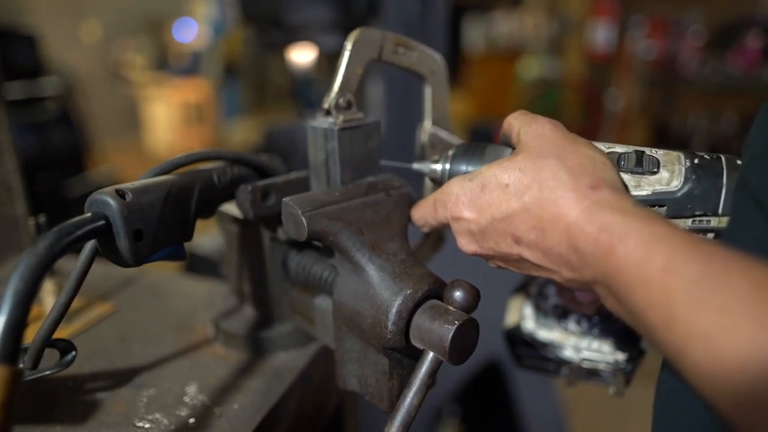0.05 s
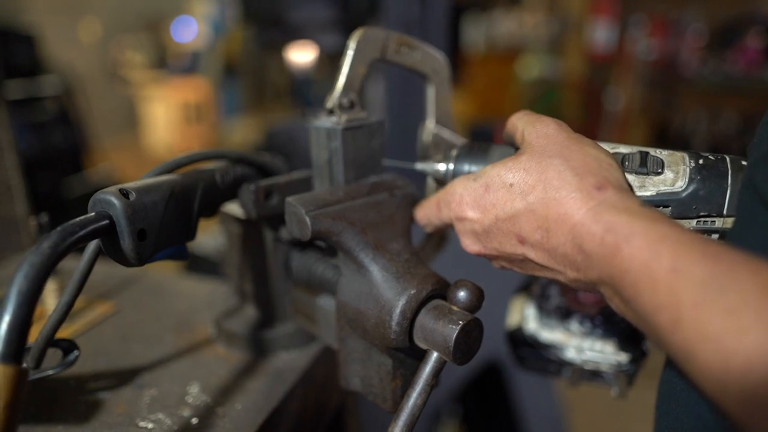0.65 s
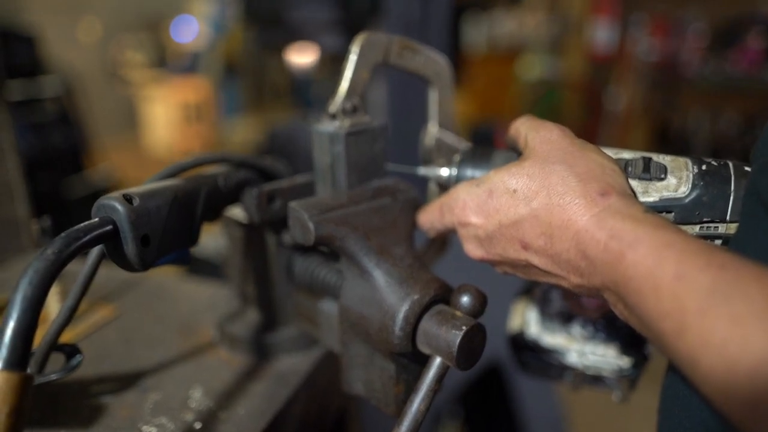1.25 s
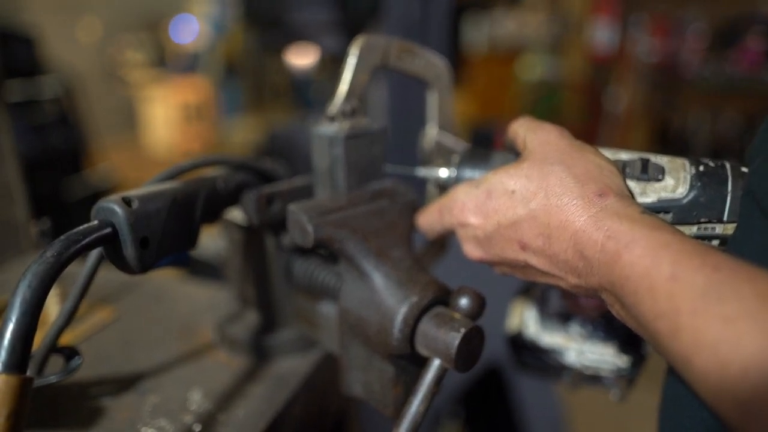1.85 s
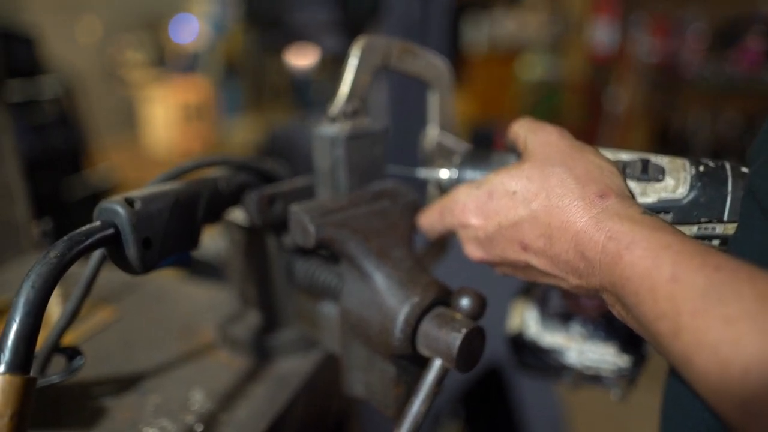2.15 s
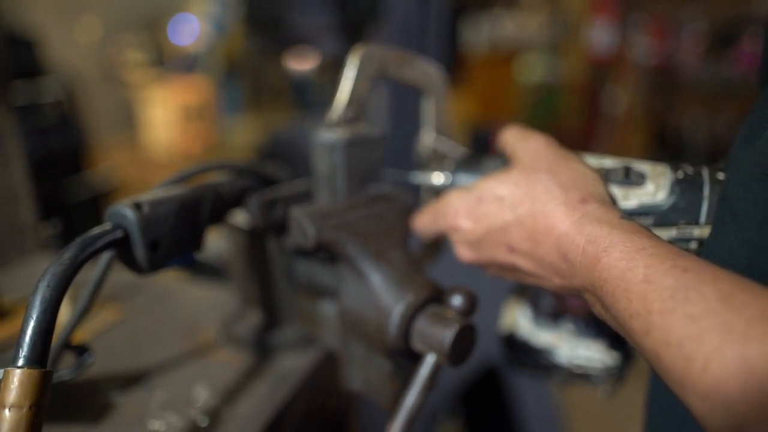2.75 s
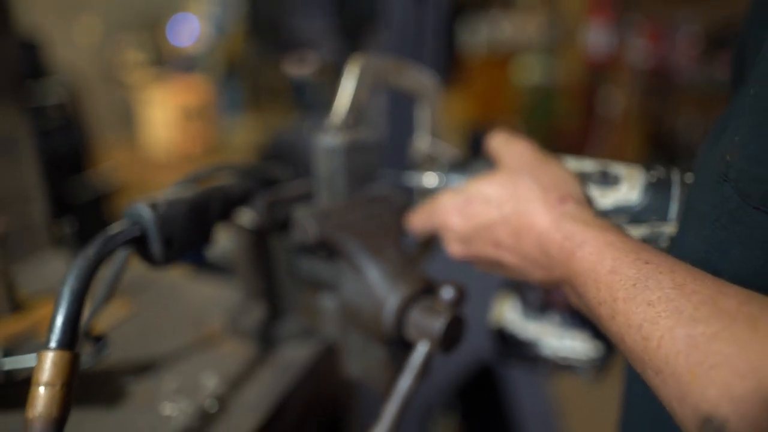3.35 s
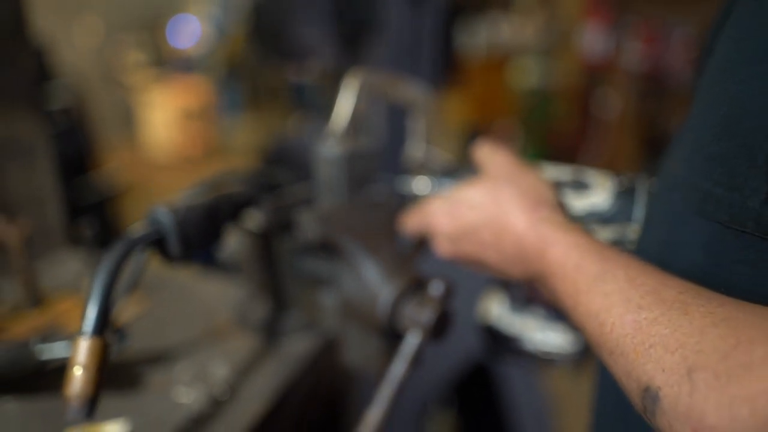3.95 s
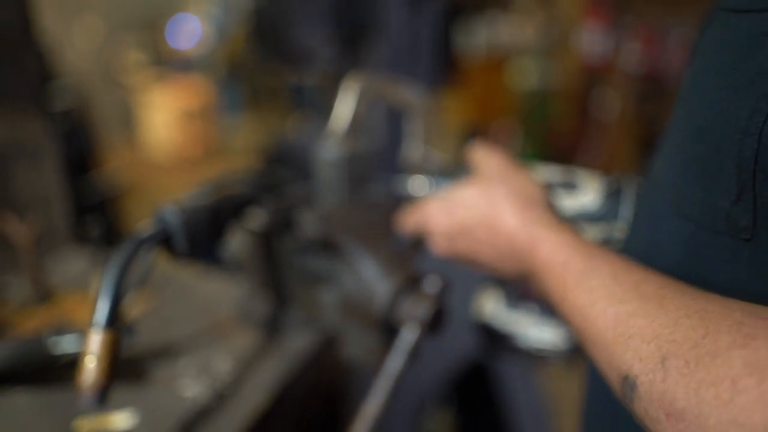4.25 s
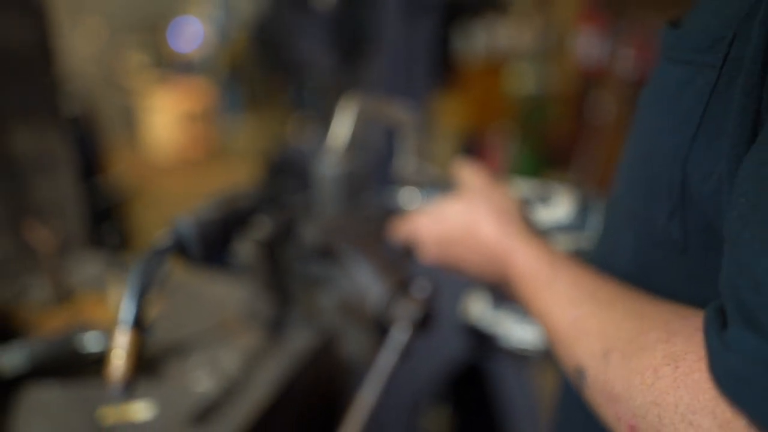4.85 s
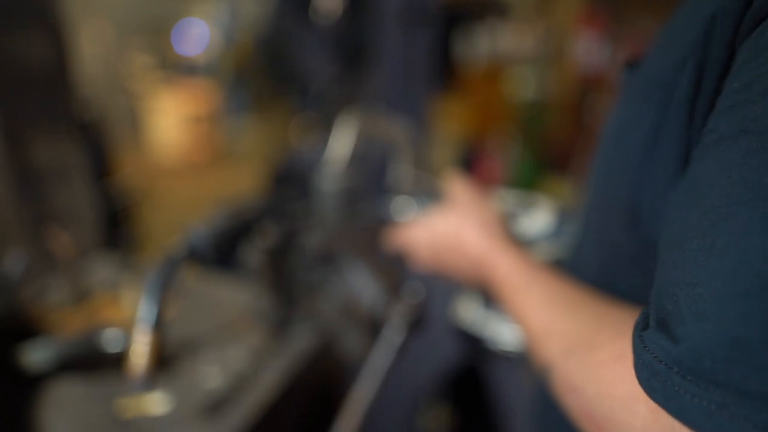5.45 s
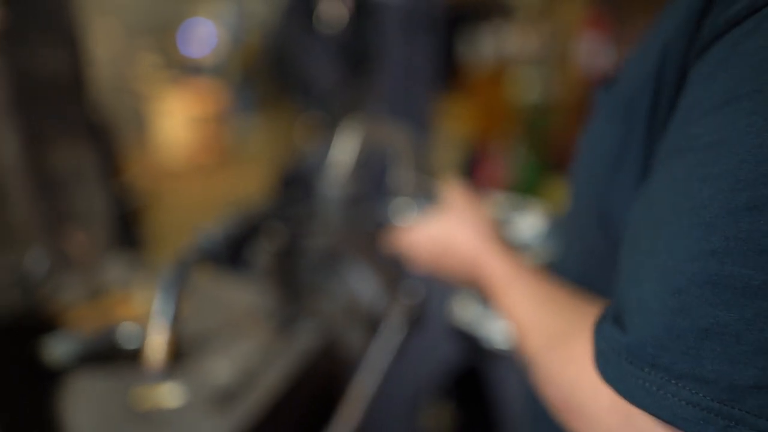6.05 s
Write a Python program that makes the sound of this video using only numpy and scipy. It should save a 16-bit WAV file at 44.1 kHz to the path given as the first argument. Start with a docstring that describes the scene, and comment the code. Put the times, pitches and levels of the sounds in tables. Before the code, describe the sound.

A cordless drill whines as it bores into metal, its pitch sagging in steps until it nearly stalls and labours on.

```python
"""A cordless drill bores into a metal can held in a vice in a workshop. At first it runs freely: the
motor whines, gear teeth rattle, the fan rushes and the bit scrapes. As the bit bites, the motor sags in
steps, and its whine and gear tones sweep down through the resonances of the casing. Around 3 s the gears
sing; from 3.55 s a hard lean shakes the bench. From 4.45 s the bit digs in and the can's ring climbs.
The motor nearly stalls twice, at 4.7 s and 5.3 s, then picks up a little and labours on."""
import sys
import numpy as np
from scipy import signal
from scipy.fft import rfft, irfft, next_fast_len
from scipy.io import wavfile
from scipy.ndimage import map_coordinates

SR = 44100
rng = np.random.default_rng(int(sys.argv[2]) if len(sys.argv) > 2 else 0)


def output_pcm(signal):
    """Save a mono or channel-first signal as 16-bit PCM at the path in sys.argv[1].

    Samples are clipped to [-1, 1] before scaling.
    """
    pcm = np.clip(np.atleast_2d(signal).T, -1, 1) * 32767
    wavfile.write(sys.argv[1], SR, np.round(pcm).astype(np.int16))


N = 269054


def amp(db):
    """Decibels to gain."""
    return 10 ** (np.asarray(db) / 20)


def unit(x):
    """Scale to rms 1."""
    return x / np.sqrt(np.mean(x ** 2) + 1e-20)


def ease(start_s, length_s):
    """A smooth step from 0 to 1."""
    progress = np.clip((np.arange(N) / SR - start_s) / length_s, 0, 1)
    return (1 - np.cos(np.pi * progress)) / 2


def wobble(rate):
    """A smooth random modulator with rate knots a second."""
    knots = rng.standard_normal(int(N * rate / SR) + 4)
    return map_coordinates(knots, [np.arange(N) * rate / SR])


def filtered(x, response):
    """Filter x by a complex response, given as a function of frequency."""
    size = next_fast_len(N + SR // 2)
    return irfft(rfft(x, size) * response(np.fft.rfftfreq(size, 1 / SR)), size)[:N]


def equalised(x, curve):
    """Shape x with an EQ curve of (frequency [Hz], gain [dB]) points."""
    points_hz, db = np.transpose(curve)
    return filtered(x, lambda hz: amp(np.interp(np.log(hz + 1), np.log(points_hz), db)))


def coloured(x, curve):
    """Shape x with an EQ curve and bring it to rms 1."""
    return unit(equalised(x, curve))


def rung(x, modes):
    """Ring a bank of resonances of alternating polarity with x."""
    return filtered(x, lambda hz: sum(
        (-1) ** k * amp(db) * 1j * hz * width / (centre ** 2 - hz ** 2 + 1j * hz * width)
        for k, (centre, width, db) in enumerate(modes)))


def tone(turns, order, waver_db, rough):
    """A partial of order cycles per shaft turn; uneven contact scatters some into a noisy skirt."""
    angle = 2 * np.pi * (order * turns + rng.random())
    skirt = wobble(330) * np.sin(angle) + wobble(330) * np.cos(angle)
    partial = (np.sqrt(2) * np.sin(angle) + rough * skirt) / np.sqrt(1 + rough ** 2)
    return amp(waver_db * wobble(9)) * partial


def workshop(x, wet_db=-5, t60_s=0.14):
    """Bench, shelves and walls add a short, dense tail; the mix comes out at rms 1."""
    t = np.arange(SR // 3) / SR
    tail = rng.standard_normal(len(t)) * amp(-60 * t / t60_s) * (t > .002)
    wet = signal.fftconvolve(x, tail / np.linalg.norm(tail))[:N]
    return unit(x + amp(wet_db) * wet)


# Low modes of the bench and vice: (frequency [Hz], width [Hz], relative level [dB])
BENCH_MODES = [(42, 25, -30), (108.1, 5, 18), (210, 61, -9.5)]
# Dull body of a knock through the can and vice: (frequency [Hz], relative level [dB])
KNOCK_EQ = [(22, -28), (45, -16), (75, -7), (150, 0), (250, 3.5), (370, 2.5), (450, 0), (620, 5.5),
            (760, -15), (1400, -25), (2500, -39)]
def bench(load, jam, lean, hole, catches_per_s=160):
    """The catching bit knocks on the can, hardest when it jams; the push sets the bench droning."""
    drone_db = -60.5 + 7 * load + 14 * jam + 10.5 * lean + 1.4 * wobble(6.5)
    knock_db = -56 + 5 * load + 8 * hole + 8 * jam + 1.8 * wobble(5.8)
    catches = (rng.random(N) < catches_per_s / SR) * rng.uniform(-1.15, 1, N)
    knocks = amp(knock_db) * coloured(workshop(catches), KNOCK_EQ)
    drone = amp(drone_db) * unit(rung(rng.standard_normal(N), BENCH_MODES))
    return knocks + drone


# Rush of the fan and brushes through the casing: (frequency [Hz], relative level [dB])
FAN_EQ = [(30, -51), (130, -30.5), (220, -12), (330, -13), (560, -6.5), (700, -9), (830, -4.5), (980, -7.5),
          (1150, -2), (1420, 0), (1650, -6), (2500, -5), (3400, -2), (5000, -24)]
def fan(load):
    """A bed of air and brush noise, weaker as the motor slows."""
    air = workshop(rng.standard_normal(N))
    return amp(-24.5 - 2.8 * load + 0.28 * wobble(8)) * coloured(air, FAN_EQ)


# Partials of the rotor's fine ripple: (order [cycles per turn])
RIPPLE_ORDERS = [5, 7, 9, 11, 15, 27, 28, 31, 32, 35, 43, 45, 49]
# Balance of those partials: (relative level [dB])
RIPPLE_DB = [-49, -48, -44.5, -56, -46, -44, -50, -45, -54, -54, -34, -48, -33]
# Treble roll-off of the vents: (frequency [Hz], gain [dB])
VENT_EQ = [(1000, -2.5), (9000, -1), (11200, -4), (12200, -24), (14000, -30)]
# Modes of the plastic shell: (frequency [Hz], width [Hz], gain [dB])
SHELL_MODES = [(196, 26, -3), (275, 17, -2.5), (455, 20, -0.5), (542.3, 18, 1.5), (580, 18, 3.5),
               (805, 110, -4)]
def rotor(turns, stall, singing):
    """The lopsided rotor hums in the shell, and its ripple leaks through the vents as thin tones."""
    shake = sum(tone(turns, order, waver_db=1.0, rough=0.09) for order in range(1, 5))
    ripple = sum(amp(db) * tone(turns, order, waver_db=0.5, rough=0.38 + 1.5 * stall)
                 for order, db in zip(RIPPLE_ORDERS, RIPPLE_DB))
    hum = amp(-44) * rung(shake, SHELL_MODES)
    return hum + amp(4.3 * singing - 3.5) * equalised(ripple, VENT_EQ)


# Bright hiss of the cutting edges on metal: (frequency [Hz], relative level [dB])
SCRAPE_EQ = [(4000, -41), (6500, -8.5), (8000, 1.5), (9000, 0.5), (10000, 1), (10700, -4.5), (11400, -4),
             (12300, -12.5), (13000, -11), (14000, -21), (15000, -50), (15800, -32)]
def bit_scrape(turns, hole, gear_ratio=11, buried_db=5):
    """The edges scrape in a gritty hiss that swells once per chuck turn and fades as the hole deepens."""
    swell = 1 + 0.052 * np.sin(2 * np.pi * turns / gear_ratio)
    grit = rng.standard_normal(N) * amp(2.0 * wobble(500) + 0.43 * wobble(9.7)) * swell
    return amp(-20 - buried_db * hole) * coloured(workshop(grit), SCRAPE_EQ)


def can_ring(load, stall, shallow_hz=4542, deep_hz=4980, width_hz=540):
    """The bit rubs the can's wall into a ragged ring that grows with load and climbs as it digs in."""
    hz = shallow_hz + (deep_hz - shallow_hz) * ease(start_s=4.45, length_s=.65)
    angle = 2 * np.pi * np.cumsum(hz) / SR
    ring = wobble(width_hz) * np.sin(angle) + wobble(width_hz) * np.cos(angle)
    flutter = amp(0.5 * wobble(120))
    return amp(-29.5 + 6.9 * load ** 2 + 1.9 * stall) * unit(ring * flutter)


# Orders [cycles per turn] of the gear tones and of the motor whine's fourth harmonic
MESH, TWIN, SIDEBAND = 19.932, 19.983, 20.75  # the twin beats against the mesh
STRAIN_LOW, STRAIN_HIGH, WHINE_FOURTH = 30.34, 40.73, 40

# Colour of the gearbox running freely: (frequency [Hz], relative level [dB])
FREE_GEARBOX_EQ = [(1500, -34), (2700, -17.5), (3300, -10.5), (3950, -9), (4300, -2), (5000, 0),
                   (5600, -0.5), (6200, -9), (7000, -4.5), (7600, -13), (9000, -9.5), (12000, -37)]
# Colour of the gearbox under load: (frequency [Hz], relative level [dB])
LOADED_GEARBOX_EQ = [(1500, -28.5), (2500, -30), (3200, -18), (3600, -7), (4050, -5), (4450, -0.5),
                     (4830, 1.5), (5220, 1.5), (5650, -6), (6100, -4), (6650, -6), (7300, -8), (9000, -9.5),
                     (12000, -42)]
def gear_rattle(turns, load, singing, smear=0.75):
    """Each tooth lands with its own force and rings the gearbox, whose colour shifts under load."""
    teeth = np.diff(np.floor(MESH * turns), prepend=0)
    blows = teeth * rng.uniform(-0.88, 1, N)
    clatter = workshop(unit(blows) + smear * rng.standard_normal(N))
    ring = (1 - load) * coloured(clatter, FREE_GEARBOX_EQ) + load * coloured(clatter, LOADED_GEARBOX_EQ)
    flutter_db = (0.62 + 0.32 * singing) * wobble(22.02)
    return amp(-15 + 0.25 * load - 1.7 * singing + flutter_db) * unit(ring)


def gear_rasp(turns, singing, lean):
    """On the housing resonance the teeth chatter: ragged bursts near the mesh tone and a partial above."""
    bursts = amp(1.9 * wobble(140))
    chatter = amp(-22.5 + 2.2 * lean) * tone(turns, (MESH + SIDEBAND) / 2, waver_db=1, rough=9.3)
    overtone = amp(-27.5) * tone(turns, STRAIN_LOW, waver_db=0.5, rough=3.2)
    return singing * bursts * (chatter + overtone)


# Resonances of the casing: (frequency [Hz], width [Hz], gain [dB])
CASING_MODES = [(1490, 260, -23), (1720, 160, -40), (1931, 340, -23.5), (2260, 160, -32), (2597, 198, -20),
                (2826, 203, -23), (3530, 520, -26.5), (3960, 240, -20), (4460, 240, -18),
                (5000, 830, -18.5), (5530, 850, -24.5), (6750, 500, -35), (8180, 1600, -16)]
# Notch from a standing wave between drill and bench: (frequency [Hz], half width [Hz], depth [0-1])
STANDING_WAVE_NOTCH = (2833, 8, .6)
def casing(hz):
    """Gain for a gliding tone: it swells across each casing resonance and dips in the notch."""
    grid_hz = np.arange(0, SR / 2, 10)
    power = sum((amp(db) / (1 + (2 * (grid_hz - centre) / width) ** 2)) ** 2
                for centre, width, db in CASING_MODES)
    notch_hz, half_width, depth = STANDING_WAVE_NOTCH
    notch = 1 - depth * np.exp(-((hz - notch_hz) / half_width) ** 2)
    return np.interp(hz, grid_hz, np.sqrt(power)) * notch


def gear_tones(turns, speed, load, stall, lean, hole):
    """The planets mesh and throb; strain brings out higher partials and the whine's fourth harmonic."""
    rough = .3 * (1 + stall / 2)
    mesh = tone(turns, MESH, waver_db=1.2, rough=rough)
    twin = amp(-3) * tone(turns, TWIN, waver_db=2.2, rough=rough)
    throb = amp(-1.16 + 1.3 * hole) * casing(MESH * speed) * (mesh + twin)
    side_gain = amp(-5.5 + 2.0 * load + 3.8 * lean - 3 * stall) * casing(SIDEBAND * speed)
    sideband = side_gain * tone(turns, SIDEBAND, waver_db=1.2, rough=0.4 + 0.8 * stall)
    heavy = load ** 4
    strain = amp(-38.5 + 9.2 * heavy) * tone(turns, STRAIN_LOW, waver_db=4.2, rough=0.36 + .3 * stall)
    edge = tone(turns, WHINE_FOURTH, waver_db=1.0, rough=.5 + .5 * stall)
    edge += amp(-3) * tone(turns, STRAIN_HIGH, waver_db=2.5, rough=.6 + stall)
    return throb + sideband + strain + amp(-42 + 6 * heavy + 11.5 * hole) * edge


def motor_whine(turns, speed, stall, bars=10):
    """The commutator bars make a clean whine, whose overtones break up near a stall."""
    hz = bars * speed
    flutter = amp((0.67 + 1.5 * stall) * wobble(12))
    first = casing(hz) * tone(turns, bars, waver_db=0.3, rough=0.16 + 0.45 * stall)
    second = casing(2 * hz) * tone(turns, 2 * bars, waver_db=5.0, rough=0.44 + 0.3 * stall)
    third = casing(3 * hz) * tone(turns, 3 * bars, waver_db=2.0, rough=0.45 + 0.6 * stall)
    halfway = tone(turns, 1.5 * bars, waver_db=-4.5, rough=0.86)
    return flutter * first + amp(-16) * second + amp(-9 + 2.9 * stall) * third + amp(-43.5) * halfway


# Changes of pressure on the drill: (time [s], glide [s], new speed [turns/s])
PRESSURE_GLIDES = [(.31, .325, 281.8), (.748, .296, 272.5), (2.04, .75, 265.9), (2.53, .22, 246.3),
                   (2.921, .203, 224.6), (4.072, .152, 206.9), (4.521, .133, 179.0), (5.349, .188, 194.7)]
# Snags of the bit that drag the motor down: (time [s], half width [s], speed lost [turns/s])
BIT_SNAGS = [(4.69, .043, 18.2), (4.786, .038, 4.2), (5.062, .055, 9.0), (5.297, .078, 27.8),
             (5.577, .05, 5.3)]
def shaft_speed(free_speed=285.1):
    """Turns per second: the motor settles at a new speed after each push and dips at each snag."""
    t = np.arange(N) / SR
    speed, before = np.full(N, free_speed), free_speed
    for start_s, glide_s, after in PRESSURE_GLIDES:
        speed += (after - before) * ease(start_s, glide_s)
        before = after
    dips = sum(lost * np.exp(-((t - time_s) / width_s) ** 2) for time_s, width_s, lost in BIT_SNAGS)
    return speed - dips


def scene():
    """Shaft speed drives the mix: the slower it turns, the heavier the load on every layer."""
    speed = shaft_speed()
    jitter = 1 + .0006 * wobble(25) + .0008 * wobble(8)
    turns = np.cumsum(speed * jitter) / SR
    # control curves, each within 0 to 1
    load = np.clip((270 - speed) / 65, 0, 1)
    stall = np.clip((192 - speed) / 20, 0, 1)
    lean = ease(start_s=3.55, length_s=.15) - ease(start_s=4.5, length_s=.15)
    hole = np.cumsum(load) / np.sum(load)  # deepens faster under load
    jam = hole * np.clip((180 - speed) / 22, 0, 1)  # the bit labours in a deep hole
    singing = np.exp(-((speed - 227) / 14) ** 2)  # the mesh sits on the housing resonance
    gears = gear_tones(turns, speed, load, stall, lean, hole)
    gears += gear_rasp(turns, singing, lean) + gear_rattle(turns, load, singing)
    drill = motor_whine(turns, speed, stall) + rotor(turns, stall, singing) + fan(load) + gears
    mix = drill + bit_scrape(turns, hole) + can_ring(load, stall) + bench(load, jam, lean, hole)
    return np.tile(mix, (2, 1))


def record(dry, hardness=6, top_hz=15750):
    """Soft-clip the highest peaks and cut the extreme treble; both channels carry the same signal."""
    rounded = dry[0] / (1 + np.abs(dry[0]) ** hardness) ** (1 / hardness)
    return np.tile(filtered(rounded, lambda hz: hz < top_hz), (2, 1))


dry = scene()
out = record(dry)
output_pcm(out)
```